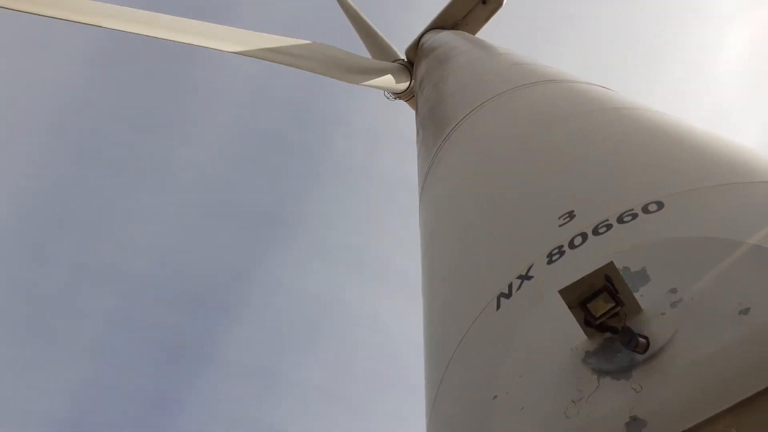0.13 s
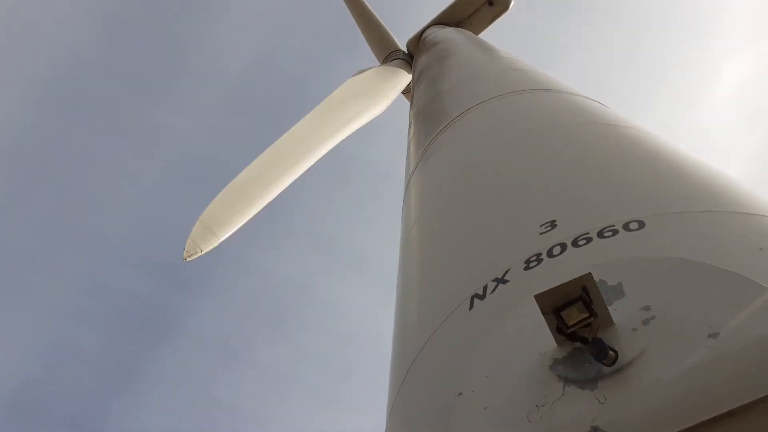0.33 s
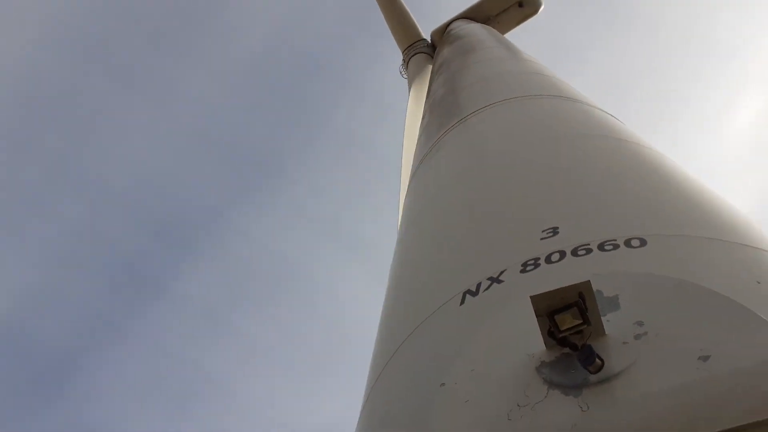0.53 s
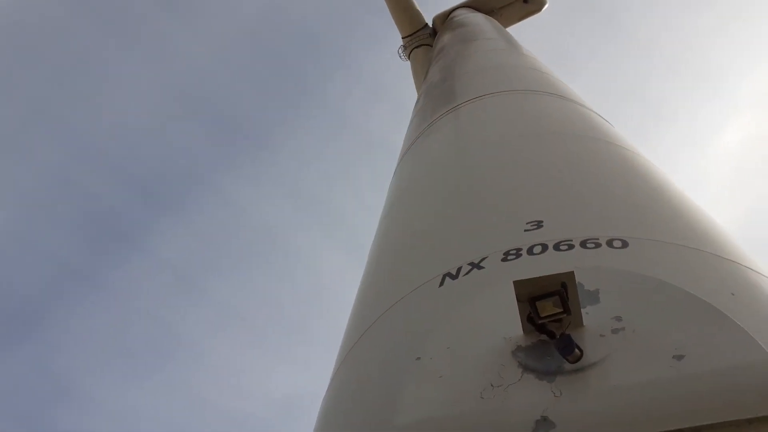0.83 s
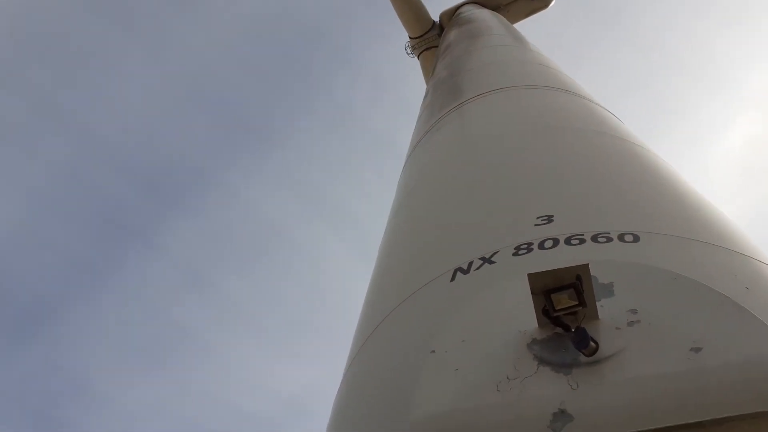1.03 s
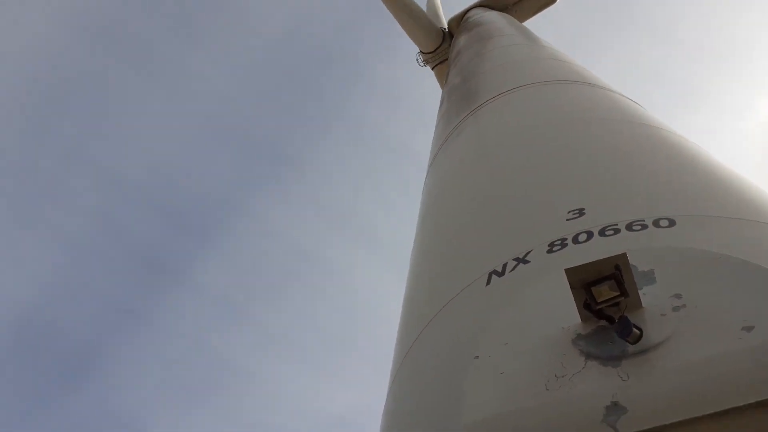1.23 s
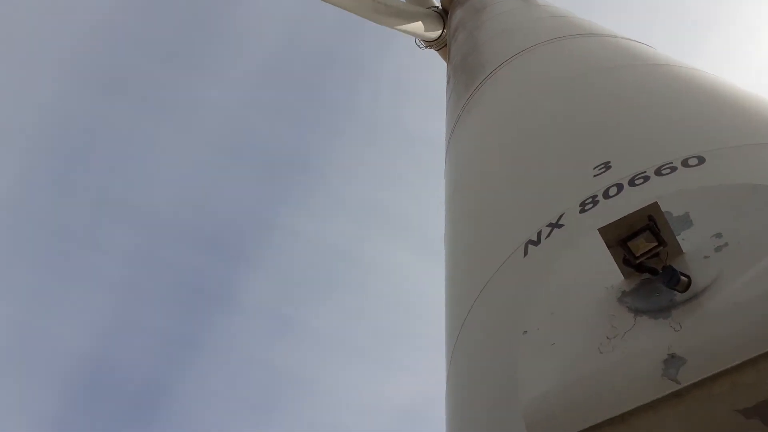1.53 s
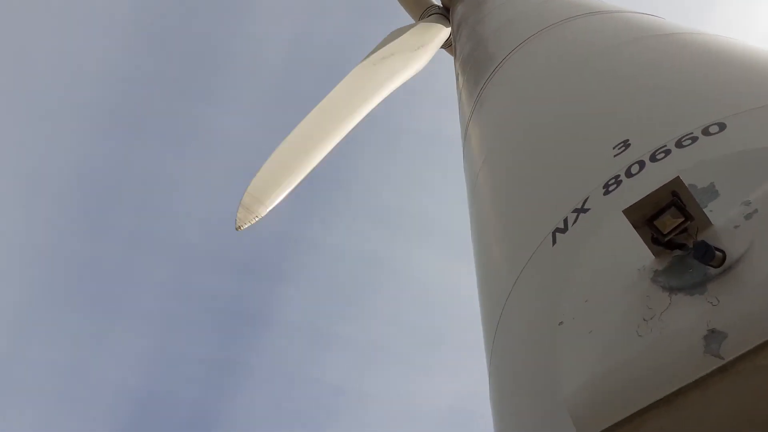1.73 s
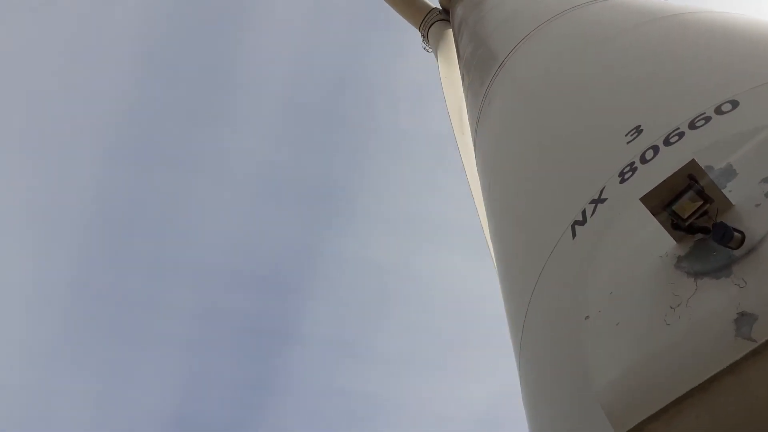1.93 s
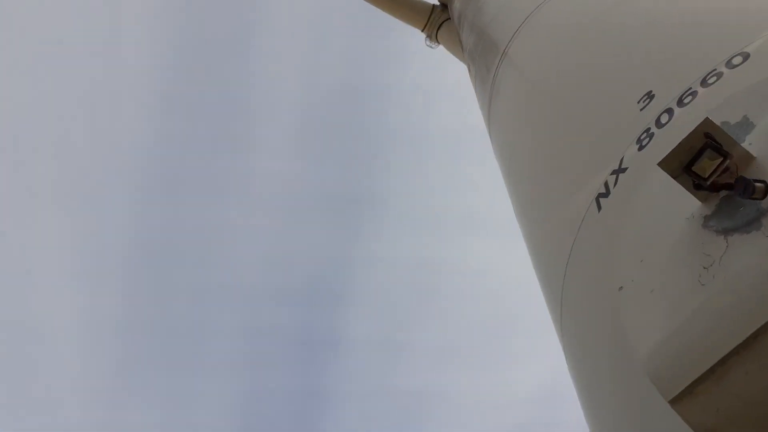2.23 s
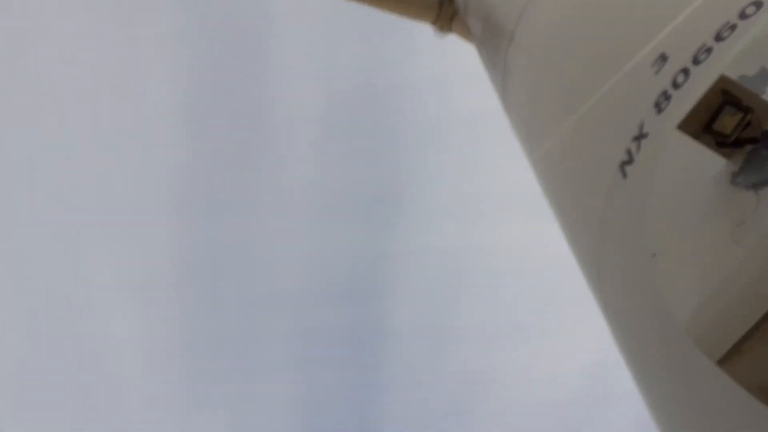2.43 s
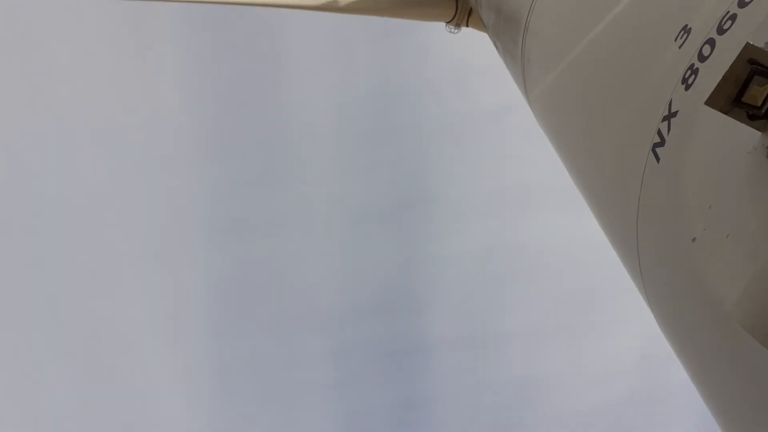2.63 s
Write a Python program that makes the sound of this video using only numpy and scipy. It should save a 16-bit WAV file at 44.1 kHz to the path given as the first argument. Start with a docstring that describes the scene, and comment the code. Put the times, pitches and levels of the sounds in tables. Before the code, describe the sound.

Wind turbine blades heard from the tower's foot: an airy rush swells, sinks in pitch and cuts off, then another follows, as gusts buffet and crackle on the microphone in open air, calming late.

```python
"""A blade's swelling rush comes down amid buffeting wind, at the foot of a wind turbine; the blades reach
the tower 1.2 to 1.4 s apart, and the third is heard only approaching. Each blade is noise with a moving
spectrum: it sinks in pitch, is combed by a tower reflection and is cut off behind the tower. Wind at the
left microphone is lumpy noise with puffs, crackle and cracks; the muffled right one gets mostly thumping
wind, as dull noise with bumps. Open air and a hollow drone are filtered noise."""
import sys
import numpy as np
from scipy import signal
from scipy.fft import rfft, irfft
from scipy.io import wavfile
from scipy.ndimage import uniform_filter1d, minimum_filter1d

SR = 44100
rng = np.random.default_rng(int(sys.argv[2]) if len(sys.argv) > 2 else 0)


def inscribe(sig):
    """Save sig as 16-bit PCM at rate SR to the path in sys.argv[1].

    A 1-D sig is mono; a 2-D sig holds one channel per row.
    Samples are clipped to [-1, 1] before scaling.
    """
    pcm = np.round(np.clip(np.atleast_2d(sig).T, -1, 1) * 32767)
    wavfile.write(sys.argv[1], SR, pcm.astype(np.int16))


N = 122157
T = np.arange(N) / SR
WINDOW, HOP = 1024, 256  # samples in a spectral frame, and between frames
HZ = np.fft.rfftfreq(WINDOW, 1 / SR)
FRAME_S = np.arange(N // HOP + 5)[:, None] * HOP / SR
AIRY_HZ = 4080  # centre of the airy blade-tip band at pitch ratio 1, at its peak

# spectrum of low wind buffeting at the left microphone: (frequency [Hz], density before level curves [dB per Hz])
BUFFET_SPECTRUM = [(20, -82.5), (55, -54.5), (115, -48), (185, -49), (260, -42), (335, -38), (450, -47.5),
                   (650, -54.5), (1000, -68.5), (1600, -82.5), (4000, -112)]
# spectrum of bright wind flutter there: (frequency [Hz], density before level curves [dB per Hz])
FLUTTER_SPECTRUM = [(150, -57), (330, -43), (480, -40.5), (680, -44.5), (1000, -53.5), (1450, -66),
                    (2000, -78.5), (3000, -87.5), (4200, -102), (6500, -120), (12000, -138)]


def amp(db):
    """Logarithmic level: decibels to amplitude gain."""
    return 10 ** (np.asarray(db) / 20)


def unit(x):
    """Power normalisation: scales to rms 1."""
    return x / np.sqrt(np.mean(x ** 2) + 1e-20)


def spectrum(points, hz):
    """Frequency response: gain at hz, interpolated in dB along log frequency."""
    f, db = np.transpose(points)
    return amp(np.interp(np.log(hz + 1), np.log(f + 1), db))


def level(points):
    """Amplitude envelope: gain at every sample, interpolated in dB over time."""
    return amp(np.interp(T, *np.transpose(points)))


def white():
    """White noise: equal power at all frequencies, at 0 dB per Hz."""
    return rng.standard_normal(N) * np.sqrt(SR / 2)


def colour(x, points):
    """Linear filtering: multiplies the transform of x by a spectrum table."""
    return irfft(rfft(x) * spectrum(points, np.fft.rfftfreq(N, 1 / SR)), N)


def eddies(rate_hz, depth_db):
    """Turbulent modulation: a random lumpy gain of mean power 1."""
    f = np.fft.rfftfreq(N, 1 / SR)
    shape = (f / rate_hz) ** .5 * np.exp(-f / rate_hz)
    lumps = unit(irfft(rfft(white()) * shape, N))
    return unit(amp(depth_db * np.tanh(lumps / 2) * 2))  # tanh bounds the swings


def moving_noise(gain):
    """Time-varying filtering: noise whose short-time spectrum follows gain (frames x bins)."""
    overlap = WINDOW - HOP
    noise = rng.standard_normal(N + 2 * WINDOW)
    frames = signal.stft(noise, nperseg=WINDOW, noverlap=overlap)[2][:, :len(gain)]
    shaped = signal.istft(frames * gain.T, nperseg=WINDOW, noverlap=overlap)[1][:N]
    return shaped * np.sqrt(SR / 2)


def swell(t, rise_s, fall_s):
    """Asymmetric Gaussian envelope: peaks at t = 0 and falls to 1/e at each width."""
    return np.exp(-(t / np.where(t < 0, rise_s, fall_s)) ** 2)


def burst(at, db, length):
    """Transient envelope: a short Gaussian bell of gain."""
    return amp(db) * np.exp(-((T - at) / length) ** 2)


def open_air():
    """Stationary ambient noise: many sources merge into one steady spectrum."""
    # ambient spectrum: (frequency [Hz], density [dB per Hz])
    air_spectrum = [(25, -83.5), (110, -61), (200, -61), (500, -67.5), (800, -89.5), (1500, -94),
                    (2400, -97), (4200, -99), (5500, -103), (7500, -103), (9800, -116), (12000, -115),
                    (15500, -121)]
    return colour(white(), air_spectrum)


def right_self_noise():
    """Sensor noise: the right microphone's own faint hiss."""
    # self-noise spectrum: (frequency [Hz], density [dB per Hz])
    floor_spectrum = [(1000, -124), (4000, -128), (8000, -131), (15000, -129)]
    return colour(white(), floor_spectrum)


def drone():
    """Resonant filtering: a narrow band drawn from noise sounds hollow."""
    # rms level of the drone, before any gain at the microphone: (time [s], level [dB])
    drone_level = [(0, -22.5), (.6, -17), (1.4, -20), (1.6, -19.5), (1.88, -21.5), (2.02, -20.5),
                   (2.25, -41), (2.77, -38.5)]
    centre_hz, width_hz = 340, 53
    f = np.fft.rfftfreq(N, 1 / SR)
    resonance = 1 / (1 + ((f - centre_hz) / width_hz) ** 2) ** 1.13
    return level(drone_level) * unit(irfft(rfft(white()) * resonance, N))


def right_wind():
    """Turbulent pressure on a microphone: dull lumpy rumble with thudding and slapping bumps."""
    # level of the steady rumble: (time [s], level [dB])
    rumble_level = [(0, -19), (.22, -20.5), (.46, -17.5), (.56, -14), (.78, -19.5), (.97, -15),
                    (1.04, -19.5), (1.25, -22), (1.32, -27.5), (1.72, -31.5), (2.06, -29), (2.3, -18.5),
                    (2.58, -19.5), (2.77, -18)]
    # relative spectrum of rumble and thuds: (frequency [Hz], gain [dB])
    thump_spectrum = [(20, -39), (33, -27), (48, -8.5), (75, -3), (112, 3), (160, -5), (240, -9),
                      (335, -8.5), (420, -23), (520, -23), (750, -39), (1100, -44.5), (1700, -60),
                      (2200, -76), (3000, -94), (5000, -105)]
    # relative spectrum of the bright part of a bump: (frequency [Hz], gain [dB])
    slap_spectrum = [(20, -28.5), (100, 4.5), (220, 2.5), (340, 5.5), (430, -1.5), (550, -13), (1000, -30),
                     (1700, -44.5), (2300, -55.5), (3200, -73.5), (7000, -105)]
    # separate bumps of wind: (time [s], level [dB], length [s], brightness as share of power [0-1])
    bumps = [(0.01, -15, 0.017, 0.3), (0.284, -18, 0.012, 0.97), (0.504, -12.5, 0.013, 0.09),
             (0.545, -10, 0.021, 0.04), (0.623, -10.5, 0.024, 0.3), (0.731, -8, 0.039, 0.08),
             (0.782, -13, 0.024, 0.5), (0.94, -14, 0.031, 1), (1.254, -19, 0.037, 0.85),
             (1.913, -20, 0.01, 0), (2.192, -14, 0.011, 0), (2.271, -13, 0.019, 0.13),
             (2.439, -16.5, 0.02, 0.9), (2.488, -17.5, 0.027, 0.46), (2.596, -16.5, 0.018, 0),
             (2.702, -19, 0.01, 1)]
    lumpy = white() * eddies(rate_hz=43, depth_db=1)
    wind = level(rumble_level) * unit(colour(lumpy, thump_spectrum))
    thud = unit(colour(white(), thump_spectrum))
    slap = unit(colour(white(), slap_spectrum))
    for at, db, length, bright in bumps:
        mix = np.sqrt(1 - bright) * thud + np.sqrt(bright) * slap
        wind = wind + burst(at, db, length) * mix
    return wind


def puffs():
    """Intermittent turbulence: small separate gusts, from dull buffet to bright flutter."""
    # puffs at the left microphone: (time [s], gain [dB], length [s], brightness as share of amplitude [0-1])
    puff_rows = [(0.259, -6, 0.0083, 0.7), (0.506, -1.5, 0.0069, 1), (0.592, -2, 0.015, .9),
                 (.715, 7, .006, 0.56), (0.819, 6.5, .012, 0.2), (1.215, 4, 0.018, 0.2),
                 (2.049, -6.5, 0.0091, 0.43), (2.082, -4.5, 0.02, 0.2), (2.218, -9, 0.024, 0),
                 (2.278, -19, 0.014, .4), (2.343, -12.5, 0.0041, 0.8), (2.359, -12, 0.004, 1),
                 (2.467, -4, 0.01, 0.28)]
    dull, bright = colour(white(), BUFFET_SPECTRUM), colour(white(), FLUTTER_SPECTRUM)
    total = np.zeros(N)
    for at, db, length, share in puff_rows:
        total += burst(at, db, length) * ((1 - share) * dull + share * bright)
    return total


def crackle():
    """Shot noise: filtered random impulses of either sign, following an envelope."""
    # relative spectrum of the crackle: (frequency [Hz], gain [dB])
    crackle_spectrum = [(300, -4.5), (900, 12), (1800, -2), (3000, -20), (4500, -34.5), (8000, -62.5),
                        (15000, -90)]
    # envelope before the overall crackle gain: (time [s], level [dB])
    crackle_level = [(0, -45), (.59, -38), (.66, -4.5), (.72, -3), (.79, -7.5), (.95, -5), (1.1, -0.5),
                     (1.19, 5), (1.28, -4), (1.42, 2.5), (1.48, -12), (1.51, -33), (2.77, -46)]
    ticks_per_s, spread_db, gain_db = 330, 3.0, -26.5
    ticks = (rng.random(N) < ticks_per_s / SR) * rng.choice([-1, 1], N)
    ticks = ticks * amp(spread_db * np.minimum(rng.exponential(1, N), 2))
    return amp(gain_db) * level(crackle_level) * unit(colour(ticks, crackle_spectrum))


def crack(at, db, length, centre_hz):
    """Impulse excitation: a sharp pressure pulse in a ragged burst, scaled to the bell's energy."""
    # relative spectrum of a crack: (multiple of the centre frequency [ratio], gain [dB])
    crack_spectrum = [(.13, -10.5), (.5, 14), (1.3, 9.5), (2, -2), (2.8, -15.5), (3.7, -34), (5.3, -52.5),
                      (9, -73.5), (16, -95)]
    core_s = .002  # cracks shorter than this are mostly one clean pulse
    bell = burst(at, 0, length)
    ragged = bell * white()
    pulse = np.arange(N) == round(at * SR)
    drive = ragged / np.linalg.norm(ragged) + pulse * core_s / length
    snap = colour(drive, [(k * centre_hz, gain_db) for k, gain_db in crack_spectrum])
    return amp(db) * snap * np.linalg.norm(bell) / np.linalg.norm(snap)


def left_wind():
    """Turbulent pressure on a microphone: low buffeting, ragged flutter, puffs, crackle and cracks."""
    # gain of the low buffeting: (time [s], level [dB])
    buffet_level = [(0, 2), (.2, -2), (.42, -3), (.62, 3.5), (.82, 1), (1.0, 1), (1.21, 1.5), (1.27, -2),
                    (1.34, -1.5), (1.39, 5.5), (1.48, 4.5), (1.52, -14), (1.9, -4), (2.05, -10.5),
                    (2.15, -13.5), (2.31, -11), (2.41, -20), (2.5, -22), (2.77, -34.5)]
    # gain of the bright flutter as the gust tears at the microphone: (time [s], level [dB])
    flutter_level = [(0, -19.5), (.43, -13), (.5, -4), (.575, -9), (.65, 4), (.73, 4), (.78, -2),
                     (.87, 1.5), (.97, -1), (1.19, 2.5), (1.29, -3), (1.475, -1.5), (1.505, -4.5),
                     (2.05, -25), (2.15, -36), (2.3, -29), (2.53, -29), (2.77, -42)]
    # single cracks of wind: (time [s], level [dB], length [s], centre frequency [Hz])
    cracks = [(0.6592, -15, 0.001, 1380), (0.716, -24, .001, 1265), (0.801, -21.5, 0.0023, 1050),
              (0.808, -18, 0.0037, 1000), (0.874, -22, 0.0024, 1294), (0.88, -19.5, 0.0019, 1163),
              (0.895, -21.5, .0015, 1200), (1.2202, -18, 0.00092, 2050), (1.2245, -18.5, 0.0024, 1850),
              (1.233, -22.5, 0.00057, 2094), (1.2647, -24, 0.0018, 1188), (1.3035, -24.5, 0.00095, 1604),
              (1.3608, -20, 0.0015, 1485), (1.363, -16.5, 0.0019, 1366), (1.3669, -19.5, 0.0014, 2200),
              (1.371, -18, 0.0018, 1350), (1.467, -15, 0.016, 830)]
    lumpy = white() * eddies(rate_hz=54, depth_db=2.0)
    buffet = colour(lumpy, BUFFET_SPECTRUM) * level(buffet_level)
    ragged = white() * eddies(rate_hz=130, depth_db=2.6) * eddies(rate_hz=18, depth_db=1.3)
    flutter = colour(ragged, FLUTTER_SPECTRUM) * level(flutter_level)
    return buffet + flutter + puffs() + crackle() + sum(crack(*row) for row in cracks)


def streaks():
    """Random modulation in time and frequency: streaks of gain make blade noise waver (frames x bins)."""
    streak_s, streak_hz, depth_db = .1, 430, 1.1
    field = rng.standard_normal((len(FRAME_S), len(HZ)))
    field = uniform_filter1d(field, size=round(streak_s / FRAME_S[1, 0]), axis=0)
    field = uniform_filter1d(field, size=round(streak_hz / HZ[1]), axis=1)
    return amp(depth_db * unit(field) * np.minimum(HZ / AIRY_HZ, 1))  # shallower in the low bins


def tower_reflection(t):
    """Comb interference: direct sound adds to a delayed reflection whose lag shrinks with time."""
    lag_ms, lag_ms_per_s = 1.0, .8  # lag on reaching the tower, and its rate of shrinking
    strength, width_s, loss_hz = .42, .3, 16000
    lag = (lag_ms - lag_ms_per_s * t) / 1000
    share = strength * np.exp(-(t / width_s) ** 2 - (HZ / loss_hz) ** 2)
    return abs(1 + share * np.exp(2j * np.pi * HZ * lag))


def blade(at, rush_db, hiss_db, pitch, sizzle_lead_s, airy_lead_s):
    """Moving turbulent source: a blade's noise swells, Doppler-shifts, interferes and is shadowed."""
    # low rush: (frequency [Hz], density before pass level and swell [dB per Hz])
    rush_spectrum = [(100, -72), (250, -69), (350, -50.5), (480, -43.5), (620, -47), (750, -53.5),
                     (1000, -60.5), (1400, -71.5), (2000, -90), (3500, -105)]
    # hiss: (frequency before pitch ratio and sag [Hz], density before pass level and swell [dB per Hz])
    hiss_spectrum = [(800, -82.5), (2000, -79.5), (2600, -80.5), (3200, -77), (4200, -80.5), (4750, -86),
                     (5200, -94), (7500, -105), (15500, -120)]
    # top of the hiss: (frequency [Hz], density before pass level and swell [dB per Hz])
    sizzle_spectrum = [(1000, -86), (3500, -88), (5600, -87.5), (7400, -86.5), (8500, -89), (9800, -94),
                       (12000, -89.5), (15500, -95)]
    rush_lead_s, hiss_lead_s = 0.23, 0.34  # loudest this long before the tower
    doppler_oct_per_s, hiss_sag_oct_per_s, airy_sag_oct_per_s = 0.78, 1, 0.9
    airy_width_oct, airy_swell_s, airy_db = 0.25, 0.21, -80  # airy_db: before pass level
    shadow_db_per_s = 168  # fall once the blade is behind the tower
    t = FRAME_S - at

    # reading a table at raised frequencies lowers the sound's pitch
    rush_t = t + rush_lead_s
    rush_hz = HZ * 2 ** (doppler_oct_per_s * np.clip(rush_t, -.4, .4))
    rush = spectrum(rush_spectrum, rush_hz) * swell(rush_t, rise_s=0.29, fall_s=0.23)

    hiss_t = t + hiss_lead_s
    hiss_hz = HZ / pitch * 2 ** (hiss_sag_oct_per_s * np.clip(hiss_t, 0, .4))  # sinks after its peak
    hiss = spectrum(hiss_spectrum, hiss_hz) * swell(hiss_t, rise_s=0.41, fall_s=0.35)

    airy_t = t + airy_lead_s
    airy_oct = np.log2((HZ + 1) / (AIRY_HZ * pitch)) + airy_sag_oct_per_s * airy_t
    airy = amp(airy_db) * np.exp(-(airy_oct / airy_width_oct) ** 2 - (airy_t / airy_swell_s) ** 2)

    sizzle = spectrum(sizzle_spectrum, HZ) * swell(t + sizzle_lead_s, rise_s=0.35, fall_s=0.36)

    # independent noises add in power
    treble = np.sqrt(hiss ** 2 + airy ** 2 + sizzle ** 2)
    direct = np.hypot(amp(rush_db) * rush, amp(hiss_db) * treble)
    shadow = amp(-shadow_db_per_s * np.maximum(t, 0))
    return direct * tower_reflection(t) * shadow


def blades():
    """Incoherent superposition: successive blade passes add in power and shape one noise."""
    # blade passes: (time of reaching the tower [s], rush level [dB], hiss level [dB],
    # pitch of hiss and airy band [ratio], lead of the sizzle peak [s], lead of the airy peak [s])
    passes = [(0.602, -7.5, 0, 1.007, 0.3, 0.18), (2.003, 0, -1.7, 0.98, 0.25, 0.32),
              (3.2, -20.5, -13, 1.0, 0.43, 0.28)]
    gain = np.sqrt(sum(blade(*row) ** 2 for row in passes))
    return moving_noise(gain * streaks())


def scene():
    """Superposition at two receivers: shared outdoor sound, with separate drone noise and wind at each."""
    # outdoor sound as the muffled right microphone hears it: (frequency [Hz], gain [dB])
    muffle = [(400, -29.5), (1000, -33.5), (2200, -39), (8000, -37)]
    outdoors = blades() + open_air()
    left = outdoors + drone() + left_wind()
    right = colour(outdoors, muffle) + amp(-27.5) * drone() + right_wind() + right_self_noise()
    return np.array([left, right])


def record(dry):
    """Peak limiting and band limiting: a quick limiter, 3 ms end fades, then a low-pass filter."""
    ceiling, edge_hz = .97, 15700
    gain = minimum_filter1d(ceiling / np.maximum(abs(dry), ceiling), size=401)
    gain = uniform_filter1d(uniform_filter1d(gain, size=200), size=200)
    to_end_s = np.minimum(T, T[::-1])
    fade = np.sin(np.pi / 2 * np.minimum(to_end_s / .003, 1)) ** 2
    low_pass = signal.firwin(511, edge_hz, window=("kaiser", 9), fs=SR)
    return signal.oaconvolve(dry * gain * fade, low_pass[None], "same")


dry = scene()
out = record(dry)
inscribe(out)
```